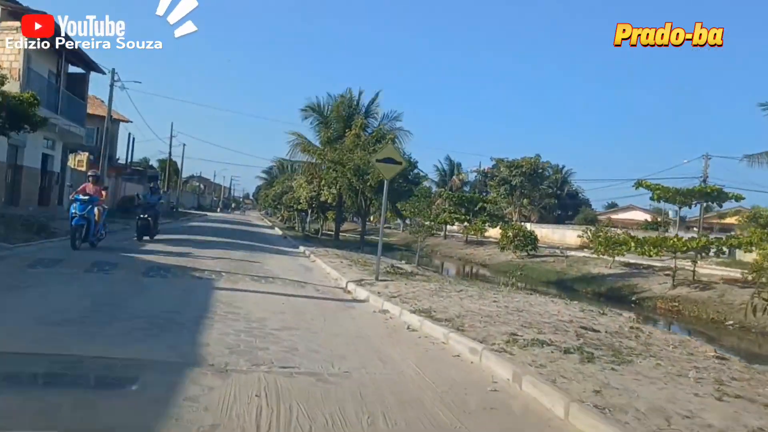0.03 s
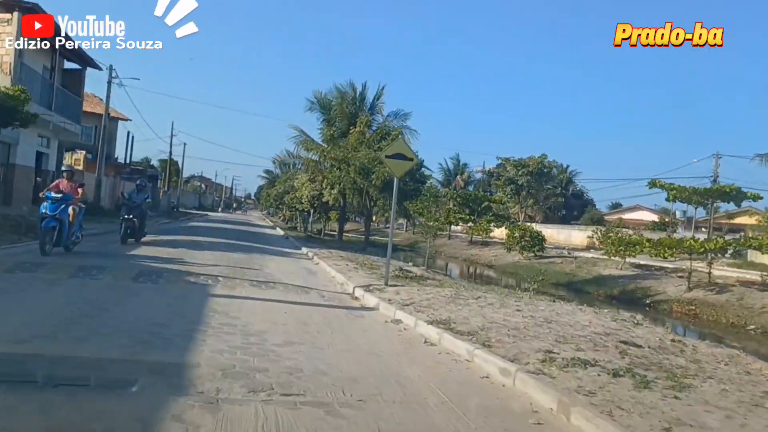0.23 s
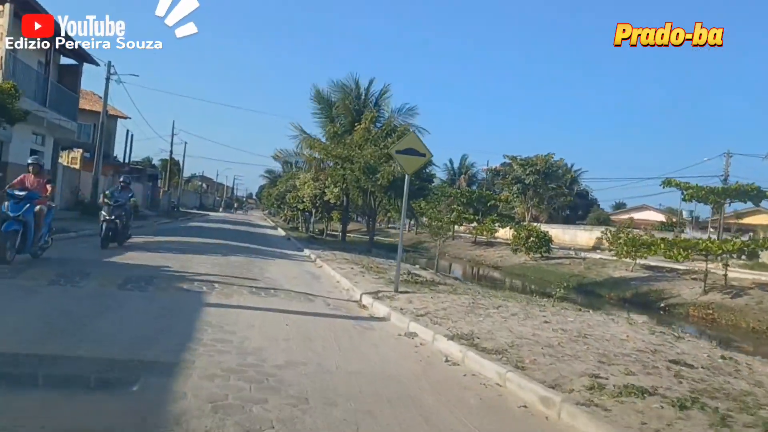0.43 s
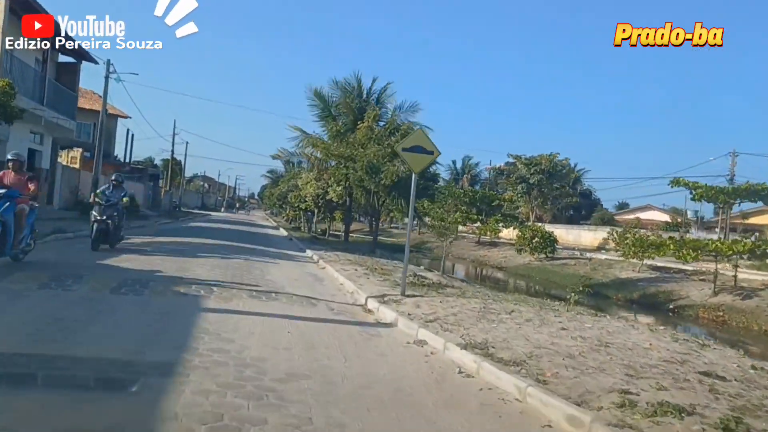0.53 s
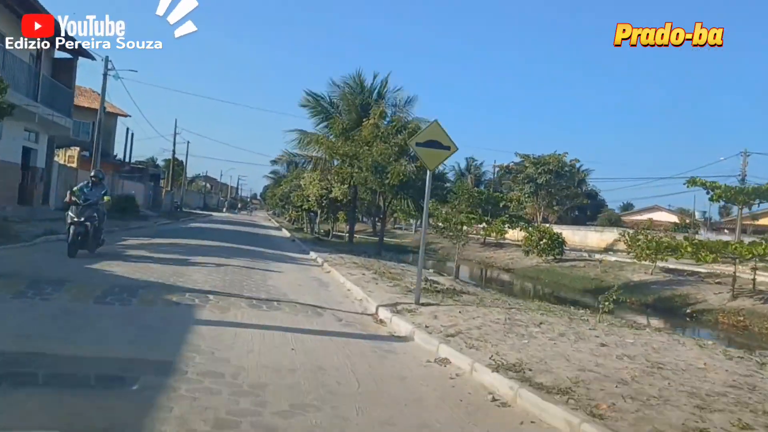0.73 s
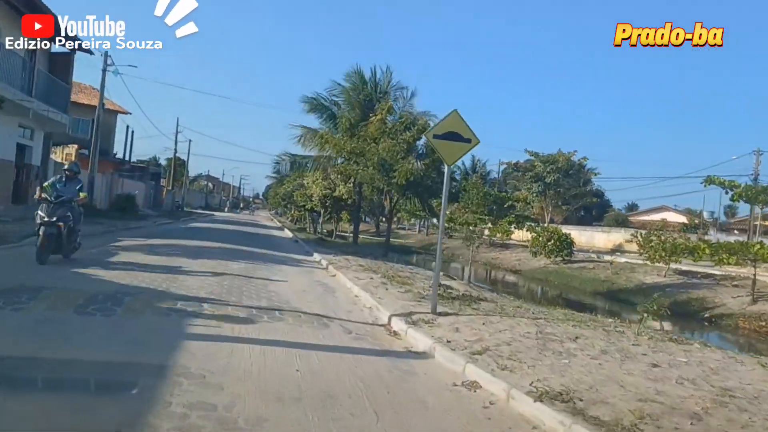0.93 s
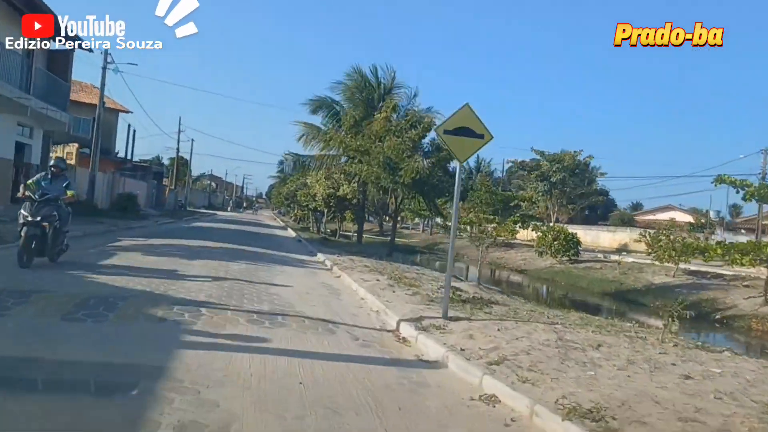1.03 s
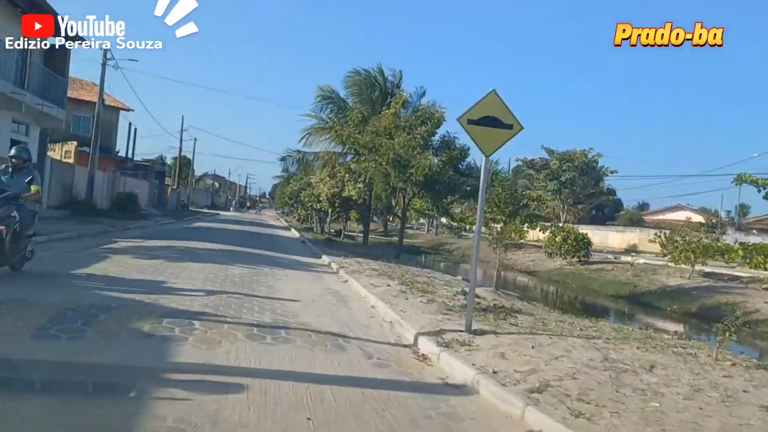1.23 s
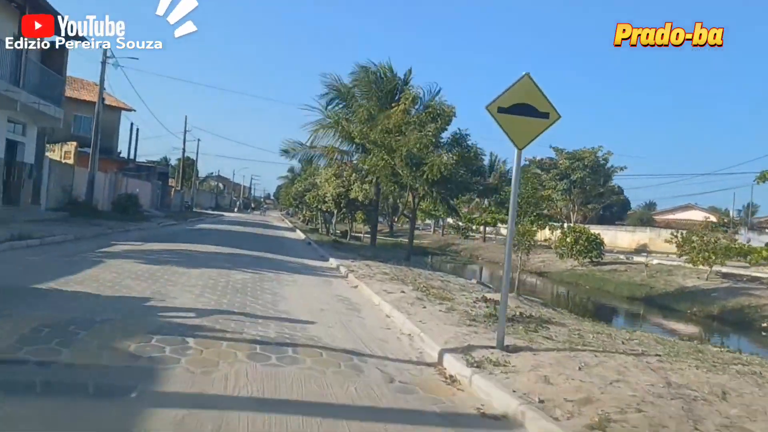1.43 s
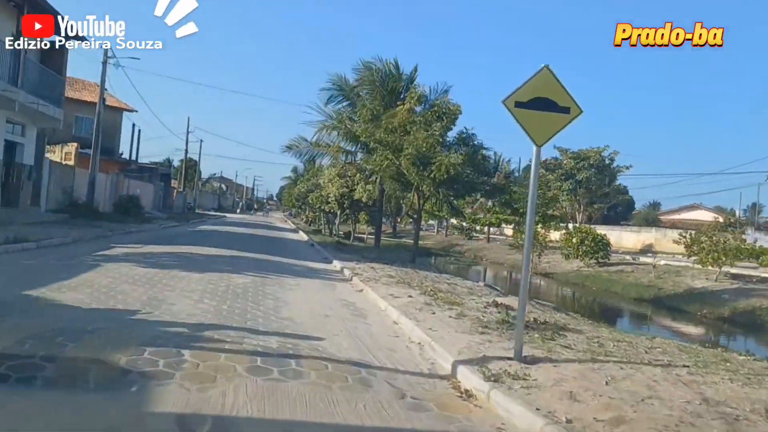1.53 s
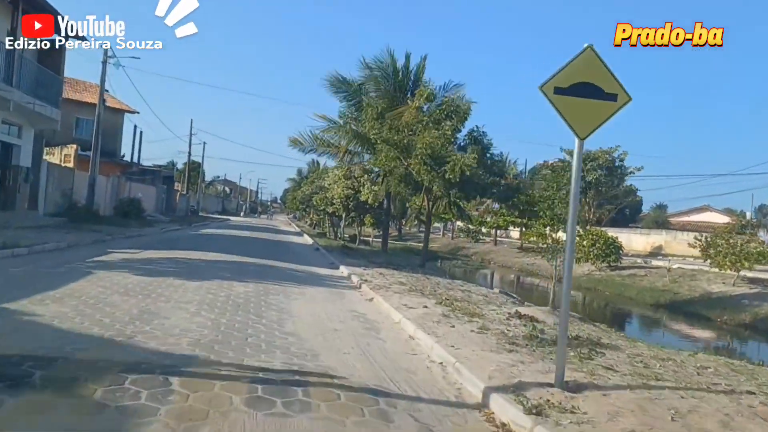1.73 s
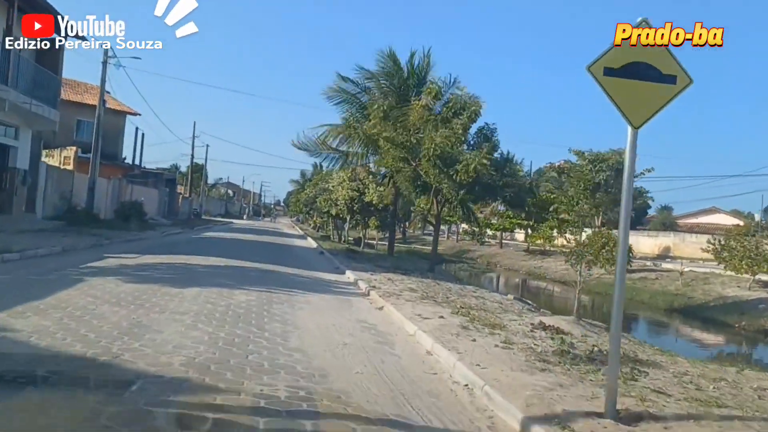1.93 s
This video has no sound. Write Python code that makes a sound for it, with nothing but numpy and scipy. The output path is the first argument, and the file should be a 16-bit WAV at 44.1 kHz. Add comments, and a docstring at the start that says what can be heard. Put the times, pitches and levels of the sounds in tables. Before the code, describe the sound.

Low rumble inside a car rolling slowly over paving blocks, with soft booms and faint rattles.

```python
"""Inside a car rolling slowly over interlocking paving blocks, with two microphone ports side by side.
It opens with a boom; joints kick the tyres throughout, and those kicks ring the suspension, cabin air and floor.
The engine hum soon rises, then slowly falls in pitch and fades. Soft trim knocks and light scuffs come and go.
Near 1.4 s the rumble jumps and booms gather, then come plastic ticks, gritty bursts and a closing rustle.
Resonances and tones make the rumble, booms, engine and trim; shaped noise makes the rolling and rustling."""
import sys
import numpy as np
from scipy import signal
from scipy.fft import rfft, irfft, next_fast_len
from scipy.io import wavfile
from scipy.ndimage import uniform_filter1d, map_coordinates

SR = 44100
rng = np.random.default_rng(int(sys.argv[2]) if len(sys.argv) > 2 else 0)


def convert_level_to_amplitude(level_db):
    """Map a level in decibels to its linear amplitude factor."""
    exponent = np.asarray(level_db, float) / 20
    return 10 ** exponent


def unload_wav(signal):
    """Save mono or channel-first audio to the path in sys.argv[1] as 16-bit WAV at rate SR, clipped to [-1, 1]."""
    wavfile.write(
        sys.argv[1],
        SR,
        np.round(np.clip(np.atleast_2d(signal).T, -1, 1) * 32767).astype(np.int16),
    )


N = 88200  # samples, 2 s

# How rough the paving is over time: time_s, roughness_db (relative)
ROAD_ROUGHNESS = [(0.02, -34.5), (0.04, -36.5), (0.084, -33.5), (0.38, -39.5), (0.424, -32), (0.56, -38),
                  (1.078, -37.5), (1.292, -34), (1.434, -21.5), (1.482, -31.5), (1.87, -33.5), (1.98, -27)]
# Resonances of the car body: pitch_hz, width_hz, level_db (relative)
BODY_RESONANCES = [(32.4, 16.3, -10.5), (48, 13, -4.5), (81.5, 19.7, -4), (114.6, 18.4, -2),
                   (139.2, 24.4, -5.5), (176.2, 42, -10.5), (253.1, 45.3, -13), (314, 93, -16.5),
                   (402, 154, -20.5)]
# Single booms of the body: crest_s, level_db, pitch_hz (at the crest), length_s
BODY_BOOMS = [(0.00995, -13, 115.85, 0.033), (.085, -21.5, 105, .04), (.15, -23, 114, 0.049),
              (.08, -23.5, 148, .04), (.475, -24, 150.4, .05), (.23, -20, 48.3, 0.083),
              (0.24, -24.5, 94, 0.045), (.44, -24.5, 137.2, 0.078), (0.49, -19.5, 100.6, 0.045),
              (0.575, -23.5, 49.5, 0.13), (0.568, -21.5, 83.5, 0.087), (0.791, -15, 87.6, 0.026),
              (0.988, -21, 47.5, 0.12), (1.087, -20.5, 53.4, 0.071), (1.291, -19.5, 135, 0.03),
              (1.43, -16.5, 135.6, 0.042), (1.445, -16, 107.7, 0.08), (1.553, -18, 85, 0.055),
              (1.514, -19.5, 51.5, 0.047), (1.691, -24, 45.4, 0.064), (1.82, -24.5, 83.3, 0.14),
              (1.6, -26.5, 57, 0.091), (1.28, -25, 44.3, 0.089), (.86, -29, 133, 0.061),
              (0.68, -32, 142, 0.1), (1.02, -25.5, 99.6, 0.093), (2, -27, 114, 0.041),
              (1.984, -26.5, 120, 0.14), (0.205, -25, 100, 0.07), (.31, -27.5, 138, 0.12),
              (.36, -17.5, 82, 0.02), (0.62, -27, 44, 0.052), (0.937, -24.5, 88.7, 0.089),
              (1.23, -25, 88, 0.1), (1.5, -20.5, 98, 0.06), (1.53, -25, 130, 0.05),
              (1.45, -22.5, 166.4, 0.037), (0.407, -24.5, 125.3, 0.045), (1.409, -29, 180, 0.036),
              (1.53, -32.5, 235, 0.085), (1.621, -34, 273.5, 0.024), (1.635, -22.5, 88, 0.06),
              (1.735, -34, 388, 0.028), (1.957, -35.5, 301, 0.02)]
# Engine firing over time: time_s, firing_rate_hz, level_db (before the order levels)
ENGINE_COURSE = [(0.05, 37.19, -57), (0.182, 37.15, -29), (0.886, 32.57, -28), (1.6, 29.7, -37.5),
                 (1.716, 31.34, -38.5), (1.95, 30.4, -43)]
# Tones of the engine: multiple of the firing rate, level_db (relative)
FIRING_TONES = [(1, -3.5), (2, -6.5), (3, -15.5), (4, -18)]
# Rolling noise over time: time_s, level_db (relative)
ROLLING_LEVEL = [(0.02, -55), (0.254, -52.5), (0.384, -55.5), (0.538, -53), (0.734, -55), (0.75, -50.5),
                 (0.93, -56.5), (0.942, -51.5), (1.248, -54.5), (1.498, -52), (1.596, -59.5), (1.624, -45),
                 (1.656, -54), (1.98, -55)]
# Colour of the rolling noise: frequency_hz, level_db (per Hz, relative)
ROLLING_COLOUR = [(88, -24.5), (150, -2), (180, -21), (250, -20), (315, -27), (480, -26.5), (580, -23),
                  (765, -26.5), (900, -31), (970, -35.5), (1400, -39), (1850, -47), (2500, -52.5),
                  (2680, -62), (3900, -92), (6600, -120)]
# Soft knocks of the trim: start_s, level_db (relative)
TRIM_KNOCKS = [(0.0613, -56.5), (0.0857, -56), (0.2166, -49), (0.325, -55.5), (0.35, -52.5),
               (0.4928, -54.5), (0.611, -54.5), (0.746, -58), (1.045, -45.5), (1.1074, -45.5),
               (1.1718, -49), (1.236, -55.5), (1.272, -53.5), (1.6125, -57)]
# Ringing modes of the trim: pitch_hz, level_db (relative), decay_s (time to fall 60 dB)
TRIM_MODES = [(610, -3, 0.07), (769.5, 5, 0.1), (1175, -2.5, 0.091), (1525, 0, .13), (1780, 1.5, 0.08),
              (1985, -8.5, 0.066), (2450, -21, 0.055), (3520, -22.5, 0.067), (4870, -19.5, .12)]
# Small plastic ticks: start_s, level_db, pitch_hz, life_s (three times the rise)
PLASTIC_TICKS = [(1.266, -64.5, 6720, .012), (1.45, -63.5, 10550, .01), (1.465, -73.5, 7150, .015),
                 (1.52, -59, 2130, 0.022), (1.532, -64, 7100, .012), (1.686, -58, 3800, 0.008),
                 (1.687, -65, 4870, .012), (1.72, -67, 7400, .012), (1.795, -62, 4900, 0.0083),
                 (1.797, -66, 7150, 0.011)]
# Rustle over time: time_s, fine_level_db, coarse_level_db (both relative)
RUSTLE_LEVELS = [(0.03, -66.5, -79), (0.142, -65.5, -72), (0.196, -71, -77.5), (0.212, -67, -72),
                 (0.364, -70, -79.5), (0.396, -65, -75.5), (0.662, -67.5, -74.5), (0.672, -69.5, -79.5),
                 (0.758, -70, -80.5), (0.834, -65.5, -72.5), (0.894, -72.5, -79), (1.082, -69.5, -74),
                 (1.098, -70.5, -74.5), (1.396, -72, -79), (1.456, -69, -76), (1.466, -64, -72),
                 (1.656, -71.5, -72.5), (1.694, -68.5, -70.5), (1.704, -71, -67.5), (1.78, -70, -68.5),
                 (1.926, -58.5, -65.5), (1.97, -63.5, -65)]
# Colour of the fine rustle: frequency_hz, level_db (per Hz, relative)
FINE_COLOUR = [(3240, -34.5), (5500, -5), (5930, -4.5), (7390, 1.5), (8710, -4), (11900, 1.5), (13800, -4),
               (15000, 0), (15800, -11)]
# Colour of the coarse rustle: frequency_hz, level_db (per Hz, relative)
COARSE_COLOUR = [(1180, -32.5), (2000, -4.5), (2340, -1), (3040, -4.5), (4400, -3.5), (6500, -12.5),
                 (8450, -43.5), (14300, -120)]
# Sudden scuffs: start_s, level_db (relative), brightness (0 to 1)
SCUFF_HITS = [(0.0933, -48.5, .5), (0.224, -53, .5), (0.3979, -47, .4), (0.5494, -49, .5), (0.709, -54, .5),
              (0.8321, -55.5, .5), (1.0997, -53, .5), (1.1397, -56, .5), (1.4646, -42.5, .7),
              (1.4944, -46, .3), (1.5304, -54, .6), (1.5894, -54, .4), (1.6286, -56, .6), (1.8482, -45, .1),
              (1.8844, -45, .55), (1.9, -47, .6), (1.9142, -47, .3), (1.933, -45, .8), (1.975, -50, .5)]
# Colour of the scuffs: frequency_hz, level_db (per Hz, relative)
SCUFF_COLOUR = [(3000, -32), (5000, -10.5), (7300, -8.5), (8700, -6), (11900, 2.5), (13500, -2.5),
                (15000, -1), (15800, -4.5)]
# Short gritty bursts in the coarse rustle: start_s, level_db (relative)
GRIT_BURSTS = [(1.6132, -64), (1.6686, -52.5), (1.7594, -58.5), (1.7944, -52), (1.8208, -57),
               (1.8851, -48.5), (1.9244, -66)]
# How alike the two ports are: frequency_hz, likeness (1 same, 0 unrelated, negative opposed)
PORT_LIKENESS = [(30, 0.9), (48, 0.99), (65, 0.93), (92, 0.87), (140, 0.85), (210, 0.75), (330, 0.75),
                 (500, 0.59), (770, -0.054), (1170, -0.21), (1790, -0.01), (2740, 0.01), (4190, 0.016),
                 (6410, 0.31), (7400, 0.36), (7900, 1), (9800, 1), (11500, .8), (15000, .85)]
# Colour difference of the ports: frequency_hz, left_over_right_db
PORT_BALANCE = [(60, 0.5), (110, -0.5), (200, 1), (380, 1.5), (700, -2), (1290, -1), (2380, -2.5),
                (4400, -5), (8120, -3), (15000, 0)]

QUARTER_TURN = np.array([[0], [np.pi / 2]])  # radians, sets the two signals of a pair apart


def unit(x):
    """Bring to rms 1."""
    return x / np.sqrt(np.mean(x ** 2) + 1e-20)


def along(points, hz):
    """Read a (Hz, value) curve at any frequency, on a log axis."""
    f, v = np.transpose(points)
    return np.interp(np.log(hz + 1), np.log(f + 1), v)


def curves(rows):
    """One value per sample for each column after the time."""
    s, *cols = np.transpose(rows)
    return [np.interp(np.arange(N) / SR, s, c) for c in cols]


def filtered(x, response):
    """Shape a sound by a (possibly complex) response of frequency."""
    m = next_fast_len(N + SR // 2)
    return irfft(rfft(x, m) * response(np.fft.rfftfreq(m, 1 / SR)), m)[..., :N]


def add(track, s, sound):
    """Mix a sound in from time s; what falls outside the track is cut."""
    i = round(s * SR)
    part = sound[..., max(-i, 0):][..., :N - max(i, 0)]
    track[..., max(i, 0):max(i, 0) + part.shape[-1]] += part


def rush(spectrum, patchy_db, size=(8, 5)):
    """A pair of coloured noises of rms 1 with patches of random gain, size in (bins, frames)."""
    z = signal.stft(rng.standard_normal((2, N)), nperseg=512)[2]
    field = rng.standard_normal(z.shape[1:])
    field = uniform_filter1d(field, size[0], 0)
    field = uniform_filter1d(field, size[1], 1)
    pair = signal.istft(z * convert_level_to_amplitude(patchy_db * unit(field)), nperseg=512)[1][:, :N]
    return unit(filtered(pair, lambda hz: convert_level_to_amplitude(along(spectrum, hz))))


def ports(pair, alike=PORT_LIKENESS):
    """Two unrelated signals become left and right, with a likeness set by frequency."""
    def mid_side(hz):
        turn = np.arccos(np.clip(along(alike, hz), -1, 1)) / 2
        return np.array([np.cos(turn), np.sin(turn)])

    mid, side = filtered(pair, mid_side)
    return np.array([mid + side, mid - side])


def body_response(f):
    """Each resonance passes a band around its pitch; neighbours alternate in sign."""
    total = 0
    for k, (centre, width, db) in enumerate(BODY_RESONANCES):
        band = 1j * f * width / (centre * centre - f * f + 1j * f * width)
        total = total + (-1) ** k * convert_level_to_amplitude(db) * band
    # fade out above 450 Hz and below 24 Hz
    return total / (1 + (f / 450) ** 4) / (1 + (24 / (f + 1)) ** 4)


def rumble():
    """Uneven kicks from the joints and fine roughness ring the body's resonances."""
    joints_per_s, scatter, spread_db = 90, 0.8986, 2.5  # scatter in joint spacings
    smooth_share = 0.41  # share of the driving power that is steady noise
    body_db, follows = 7.5, 0.39  # level over the road's; share of the road's swings in dB
    road_db, = curves(ROAD_ROUGHNESS)
    draw = rng.standard_normal((400, 4))
    at = ((np.arange(400) + scatter * draw[:, 0]) / joints_per_s * SR).astype(int)
    keep = (at >= 0) & (at < N)
    strength = convert_level_to_amplitude(spread_db * draw[:, 1])
    # the same joints kick both signals, with unrelated signs
    kicks = np.array([np.bincount(at[keep], (strength * np.sign(draw[:, k]))[keep], N) for k in (2, 3)])
    roughness = rng.standard_normal((2, N))
    drive = np.sqrt(1 - smooth_share) * unit(kicks) + np.sqrt(smooth_share) * roughness
    mean_db = road_db.mean()
    level_db = body_db + mean_db + follows * (road_db - mean_db)
    return convert_level_to_amplitude(level_db) * unit(filtered(drive, body_response))


def booms():
    """One resonance swells and dies as a wheel rides over a raised block."""
    sag_per_s = 0.6  # share of its pitch that a boom loses each second
    out = np.zeros((2, N))
    t = np.arange(-SR // 5, SR // 5) / SR  # zero at the crest
    for s, db, hz, length in BODY_BOOMS:
        phase = rng.uniform(0, 2 * np.pi) + QUARTER_TURN
        swell = np.exp(-(2 * t / length) ** 2 / 2)
        tone = np.sin(2 * np.pi * hz * t * (1 - sag_per_s * t / 2) + phase)
        add(out, s + t[0], convert_level_to_amplitude(db) * swell * tone)
    return out


def engine():
    """The engine slows off the throttle; its firing hums low under the floor."""
    rate, level_db = curves(ENGINE_COURSE)
    turn = 2 * np.pi * np.cumsum(rate) / SR
    hum = np.zeros((2, N))
    for k, db in FIRING_TONES:
        phase = rng.uniform(0, 2 * np.pi) + QUARTER_TURN
        hum += convert_level_to_amplitude(db) * np.sin(k * turn + phase)
    return np.sqrt(2) * convert_level_to_amplitude(level_db) * hum


def tyres():
    """Rolling noise through floor and doors, surging in short narrow streaks."""
    level_db, = curves(ROLLING_LEVEL)
    return convert_level_to_amplitude(level_db + 14) * rush(ROLLING_COLOUR, patchy_db=2, size=(2, 7))


def trim_knocks():
    """Soft knocks ring the trim's modes, each dying away at its own pace."""
    knock_db, attack_s = -1, 0.0057
    scatter_db, waver = 2, 0.07  # spread of each mode's level; phase noise, radians a sample
    out, t = np.zeros((2, N)), np.arange(SR // 5) / SR
    count = len(TRIM_MODES)
    for s, db in TRIM_KNOCKS:
        level = rng.normal(0, scatter_db, count)
        phase = rng.uniform(0, 2 * np.pi, (2, count))
        rough = np.cumsum(waver * rng.standard_normal((count, len(t))), axis=1)
        ring = np.zeros((2, len(t)))
        for k, (hz, mode_db, t60) in enumerate(TRIM_MODES):
            tone = np.sin(2 * np.pi * hz * t + phase[:, [k]] + rough[k])
            ring += convert_level_to_amplitude(mode_db + level[k] - 60 * t / t60) * tone
        add(out, s, convert_level_to_amplitude(db + knock_db) * (1 - np.exp(-t / attack_s)) * ring)
    return out


def trim_ticks():
    """Ticks are short narrow puffs: a tone made noisy by a wandering phase."""
    waver = 0.14  # phase noise, radians a sample
    out, t = np.zeros((2, N)), np.arange(SR // 5) / SR
    for s, db, hz, life in PLASTIC_TICKS:
        wander = np.cumsum(waver * rng.standard_normal((2, len(t))), axis=1)
        phase = wander + rng.uniform(0, 2 * np.pi, (2, 1))
        puff = 3 * t / life * np.exp(1 - 3 * t / life)  # peaks at 1
        add(out, s, convert_level_to_amplitude(db) * puff * np.sin(2 * np.pi * hz * t + phase))
    return out


def rustle():
    """Light hiss in a fine and a coarse band, flickering together, with crackle and grit in the coarse."""
    flicker_db, flickers_per_s = 0.77, 35
    crackles_per_s, crackle_db, crackle_s = 60, -1, 0.004
    fine_db, coarse_db = curves(RUSTLE_LEVELS)
    knots = rng.standard_normal(200)
    flicker = flicker_db * map_coordinates(knots, [np.arange(N) * flickers_per_s / SR])
    fine = convert_level_to_amplitude(fine_db + flicker) * rush(FINE_COLOUR, patchy_db=2.5)
    grains, grit, t = np.zeros(N), np.zeros(N), np.arange(SR // 5) / SR
    for when, size in rng.uniform(size=(round(crackles_per_s * N / SR), 2)):
        add(grains, when * N / SR, size ** 2 * np.exp(-t / crackle_s))
    for s, db in GRIT_BURSTS:
        add(grit, s, convert_level_to_amplitude(db - 12) * (1 - np.exp(-t / 0.0016)) * np.exp(-t / 0.01))
    coarse = convert_level_to_amplitude(coarse_db + 2.5 + flicker) * (1 + convert_level_to_amplitude(crackle_db) * grains) + grit
    return ports(fine + coarse * rush(COARSE_COLOUR, patchy_db=2.5))


def scuffs():
    """Sudden bursts of rubbing noise; a bright one sounds mostly above the split frequency."""
    attack_s, life_s, split_hz = 0.0031, 0.019, 12200
    likeness = 0.4  # scuffs are close to the ports, so left and right differ more
    level, t = np.zeros((2, N)), np.arange(SR // 5) / SR  # rows: below and above the split
    for s, db, bright in SCUFF_HITS:
        share = np.sqrt(2 * np.array([[1 - bright], [bright]]))
        add(level, s, convert_level_to_amplitude(db - 9.5) * share * (1 - np.exp(-t / attack_s)) * np.exp(-t / life_s))
    rub = ports(rush(SCUFF_COLOUR, patchy_db=2.5, size=(9, 4)), [(9000, likeness)])
    dull = filtered(rub, lambda hz: 1 / (1 + (hz / split_hz) ** 20))
    return level[0] * dull + level[1] * (rub - dull)


def scene():
    """Car sounds reach the ports through the cabin; rustle and scuffs are added beside them."""
    car = rumble() + booms() + engine() + tyres() + trim_knocks() + trim_ticks()
    return ports(car) + rustle() + scuffs()


def roll_off(x):
    """The treble ends steeply here."""
    return signal.sosfilt(signal.butter(12, 16520, fs=SR, output="sos"), x)


def record(dry):
    """The two ports differ a little in colour, and nothing passes above the top frequency."""
    top_hz = 15800
    half = np.array([[0.5], [-0.5]])  # half the difference to each port
    mix = filtered(dry, lambda hz: convert_level_to_amplitude(half * along(PORT_BALANCE, hz)) * (hz < top_hz))
    return roll_off(mix)


dry = scene()
out = record(dry)
unload_wav(out)
```